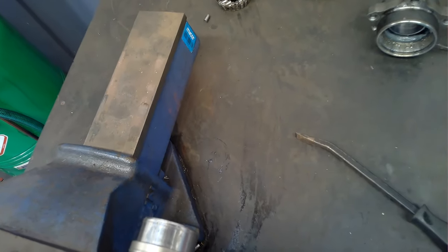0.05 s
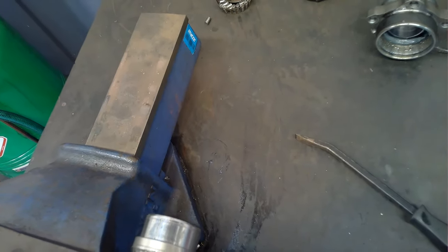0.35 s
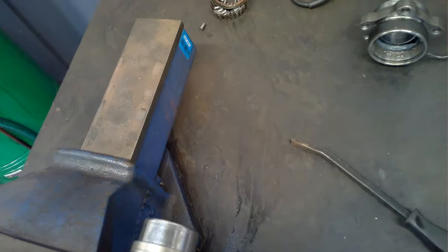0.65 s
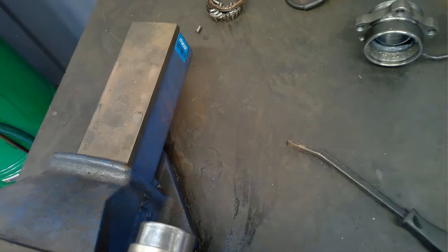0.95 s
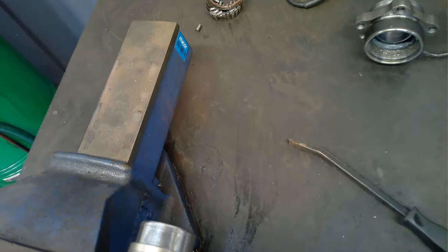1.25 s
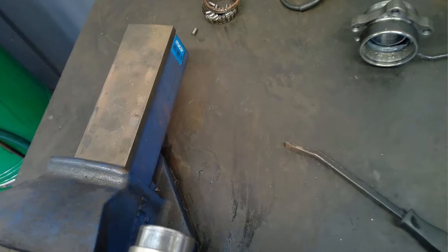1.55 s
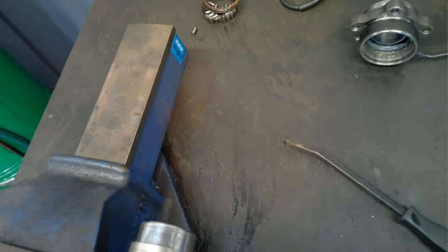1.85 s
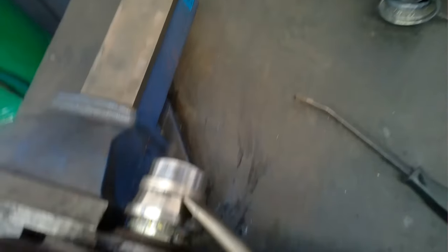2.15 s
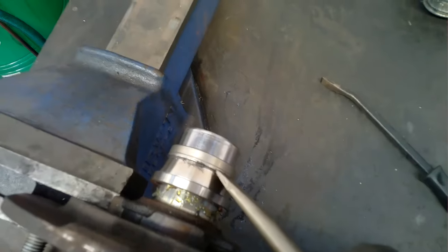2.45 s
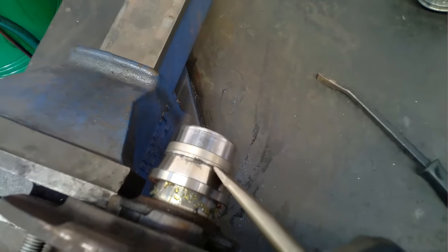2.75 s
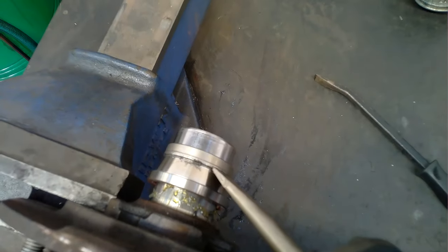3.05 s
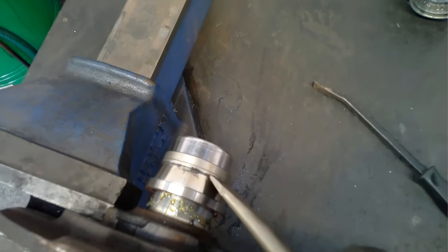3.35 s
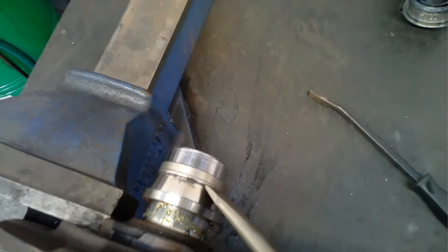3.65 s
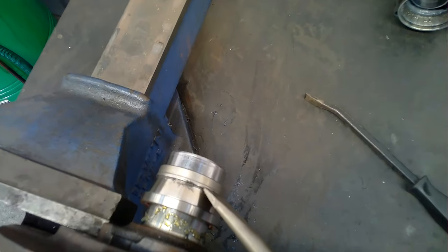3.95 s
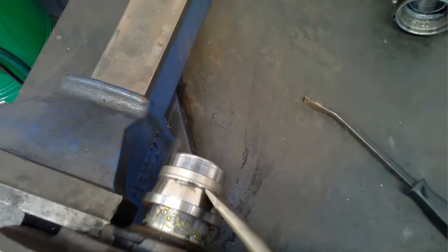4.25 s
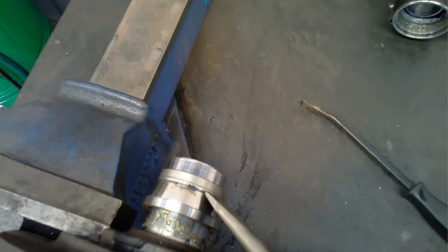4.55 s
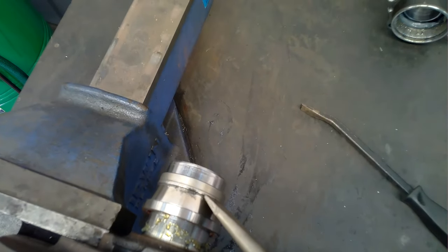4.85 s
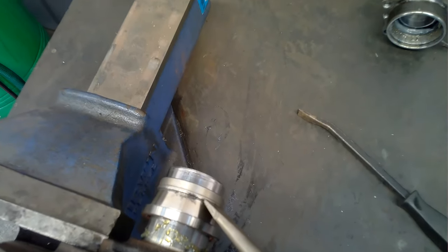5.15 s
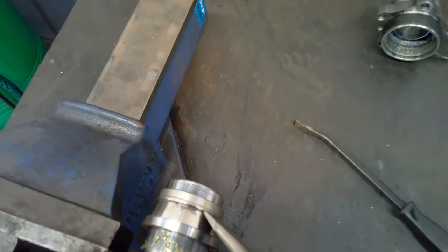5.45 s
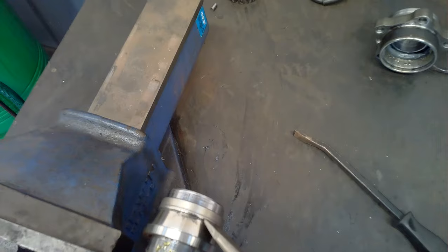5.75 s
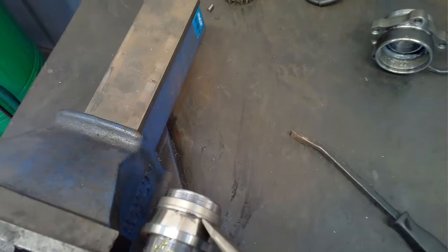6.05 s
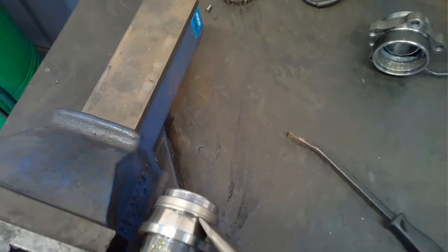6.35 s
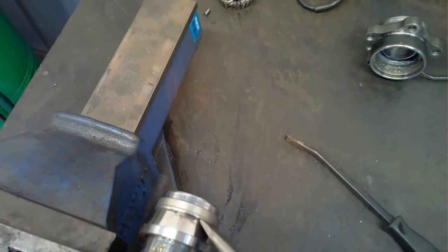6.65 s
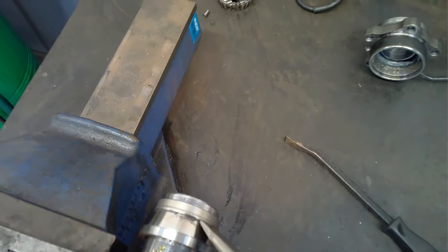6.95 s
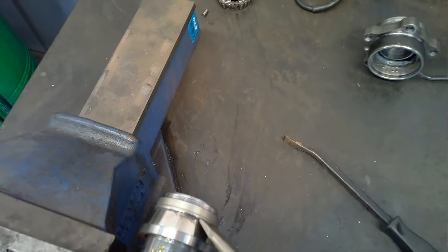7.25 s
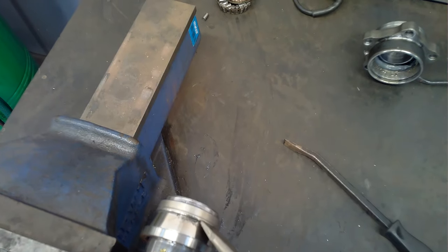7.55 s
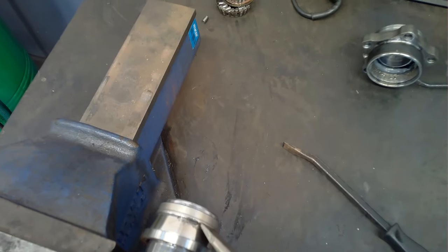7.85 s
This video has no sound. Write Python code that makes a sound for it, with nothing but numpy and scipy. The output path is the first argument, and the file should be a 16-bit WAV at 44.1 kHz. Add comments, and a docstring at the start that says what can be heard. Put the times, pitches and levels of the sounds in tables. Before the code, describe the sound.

Rapid, continuous air hammer blows on metal in a small workshop, ringing shrilly over puffing air and a bench drone.

```python
"""An air hammer drives a pointed chisel against a seized steel collar in a vise, about 56 blows a second.
Each cycle opens with an exhaust puff, a rush of spent air and a thud through the bench; then the blow
lands and rings chisel, collar and vise into a high, clattering whine in the small workshop.
Near 2 s the stereo microphone moves close over the chisel and the bench drones more deeply.
From 5 to 6 s it draws back, and the hammer runs on, sagging to about 53 blows a second."""
import sys
import numpy as np
from scipy import signal
from scipy.fft import rfft, irfft
from scipy.io import wavfile
from scipy.ndimage import uniform_filter1d

SR = 44100
rng = np.random.default_rng(int(sys.argv[2]) if len(sys.argv) > 2 else 0)


def inscribe(sig):
    """Save sig as 16-bit PCM at rate SR to the path in sys.argv[1].

    A 1-D sig is mono; a 2-D sig holds one channel per row.
    Samples are clipped to [-1, 1] before scaling.
    """
    pcm = np.round(np.clip(np.atleast_2d(sig).T, -1, 1) * 32767)
    wavfile.write(sys.argv[1], SR, pcm.astype(np.int16))


N = 352800
T = np.arange(N) / SR

# How the work is held: time_s, stance (0 first grip, 1 microphone close over the chisel, 2 drawn back)
STANCE_PATH = [(0, 0), (1.9, 0), (2.12, 0.82), (4.9, 1.04), (5.9, 2), (8, 2)]


def amp(db):
    """Decibels to gain."""
    return 10 ** (np.asarray(db) / 20)


def unit(x):
    """Scales to rms 1."""
    return x / np.sqrt(np.mean(x ** 2) + 1e-20)


def curve(rows):
    """A time table's value at every sample."""
    return np.interp(T, *np.transpose(rows))


def by_stance(levels):
    """A level given for each stance, gliding as the stance shifts."""
    return np.interp(curve(STANCE_PATH), np.arange(len(levels)), levels)


def read(points, hz):
    """A spectrum's value at hz, on a log-frequency axis."""
    freqs, values = np.transpose(points)
    return np.interp(np.log(hz + 1), np.log(freqs), values)


def convolve(x, responses):
    """One signal through each response, a channel apiece."""
    return signal.oaconvolve(np.atleast_2d(x), responses, axes=1)[:, :N]


def mic_ports(hz):
    """Gain and phase at the microphone's left and right port."""
    # Phase between the ports: freq_hz, left_lead_rad
    lead = [(56, 0.43), (112, 1.23), (180, 2.44), (600, 2.2), (1100, 1.31), (1600, 2.27), (2150, 1.54),
            (2400, 0.4), (2700, 0.59), (3000, 1.9), (3450, 2.25), (4500, 0.21)]
    # Balance between the ports: freq_hz, left_over_right_db
    balance = [(56, -1), (112, 2.5), (300, -5), (700, -4), (1000, -4), (1500, -5.5), (2500, 0.5),
               (7500, 0.5), (9000, -2), (10000, -3.5), (11500, -5.5), (14000, -2)]
    left = amp(read(balance, hz) / 2)
    return np.array([left * np.exp(1j * read(lead, hz)), 1 / left])


def noise(spectrum, size):
    """Coloured noise, partly alike at the two microphone ports."""
    # Likeness of left and right: freq_hz, coherence
    likeness = [(50, 0.62), (150, 0.34), (400, 0.64), (1500, 0.087), (3300, 0.66), (5000, 0.068),
                (12000, 0.1)]
    hz = np.fft.rfftfreq(size, 1 / SR)
    common, apart = rfft(rng.standard_normal((2, size)))
    same = np.clip(read(likeness, hz), 0, 1)
    pair = np.array([common, same * common + np.sqrt(1 - same ** 2) * apart])
    return unit(irfft(pair * mic_ports(hz) * amp(read(spectrum, hz)), size))


def clicks(times, spread_db):
    """A band-limited click of random size at each time."""
    centres = times[:, None] * SR
    taps = np.floor(centres).astype(int) + np.arange(-8, 9)
    shape = np.sinc(taps - centres) * np.cos(np.pi * (taps - centres) / 18) ** 2
    shape *= amp(spread_db * rng.standard_normal(centres.shape))
    return unit(np.bincount(np.clip(taps, 0, N).ravel(), shape.ravel(), N + 1)[:N])


def bursts(times, rise_s, decay_s):
    """An envelope that swells after each time and dies away."""
    t = np.arange(4096) / SR
    swell = (1 - np.exp(-t / rise_s)) * np.exp(-t / decay_s)
    return unit(convolve(clicks(times, spread_db=.35), [swell])[0])


def jittered(times, spread_s):
    """The same times, each slightly early or late."""
    return times + spread_s * rng.standard_normal(len(times))


def piston():
    """Times at which the piston passes the exhaust port, once a cycle."""
    # Piston speed: time_s, blows_per_s
    speed = [(0, 56.5), (0.19, 58.01), (0.45, 54.33), (0.79, 57.91), (1.52, 55.73), (2.11, 57.18),
             (2.33, 54.86), (2.59, 56.93), (2.92, 57.29), (3.42, 55.84), (4.59, 55.62), (4.82, 54.29),
             (5.52, 55.76), (5.75, 53.37), (6.0, 54.02), (6.3, 52.83), (6.71, 55.01), (8, 52.72)]
    cycles = np.cumsum(curve(speed)) / SR - .405
    return np.interp(np.arange(int(cycles[-1]) + 1), cycles, T)


def workshop(x, size=22050):
    """The room's diffuse tail, lingering longest around 5 kHz."""
    # Room decay: freq_hz, t60_s
    decay = [(100, 0.26), (1000, 0.047), (5000, 0.82), (14000, 0.017)]
    hz, t, wash = signal.stft(rng.standard_normal((2, size)), SR, nperseg=256)
    tail = signal.istft(wash * amp(-60 * t / read(decay, hz)[:, None]), SR, nperseg=256)[1]
    tail *= np.arange(tail.shape[1]) / SR > .005  # pre-delay
    return convolve(x, tail / np.linalg.norm(tail[0]))


def bench(times, waver_db=.2, waver_s=.44):
    """Recoil thumps the bench; a low mode sings out when a multiple of the blow rate meets it."""
    # Modes of bench and vise stand: pitch_hz, width_hz, grip_db, close_db, back_db
    bench_modes = [(53, 22, -75, -59, -64), (110.3, 48, -58, -59.5, -56), (219.4, 20, -61, -55, -63.5),
                   (275.6, 18, -70, -59.5, -64.5), (406.7, 15, -73.5, -59, -67), (746, 19, -70, -60.5, -71)]
    t = np.arange(4096) / SR
    recoil = clicks(times, spread_db=3.5)
    drone = 0
    for hz, width, *levels in bench_modes:
        # each mode swells and sinks as the pressure on the tool wavers
        waver = np.interp(T / waver_s, np.arange(64), rng.standard_normal(64))
        thud = np.exp(-np.pi * width * t) * np.sin(2 * np.pi * hz * t)
        drone += amp(by_stance(levels) + waver_db * waver) * unit(convolve(recoil, [thud]))
    return drone * amp([[-1], [1]])  # leans right


def spent_air(times):
    """Turbulent air rushes and hisses out each time the exhaust opens."""
    # Colour of the turbulence: freq_hz, level_db
    colour = [(12, -15), (40, -2.5), (120, -1), (300, -3), (600, -4), (1000, -8.5), (2100, -4.5),
              (2400, -12), (2750, -6), (3200, -10), (7000, -10.5), (11000, -22), (15000, -29)]
    return noise(colour, N) * bursts(times, rise_s=.0016, decay_s=.026)


def exhaust(times, size=4096):
    """A sharp pressure step each cycle, coloured by the exhaust passage."""
    # Colour of one puff: freq_hz, level_db
    colour = [(30, -13), (110, -4.5), (200, -1), (330, -2.5), (450, 2), (570, 1), (640, -7), (745, 1.5),
              (950, -9.5), (1300, -5), (2170, -4), (2380, -39), (4000, -15.5), (9000, -64.5)]
    hz = abs(np.fft.fftfreq(size, 1 / SR))
    # minimum phase keeps the attack sharp
    spectrum = np.exp(np.conj(signal.hilbert(read(colour, hz) * np.log(10) / 20)))
    half = size // 2 + 1
    preroll_s = 70 / SR  # room for the left port to lead
    delay = np.exp(-2j * np.pi * hz[:half] * preroll_s)
    puff = irfft(spectrum[:half] * mic_ports(hz[:half]) * delay)
    steps = clicks(times - preroll_s - .0003, spread_db=.45)
    return unit(convolve(steps, puff[:, :size // 2]))


def clatter(times, rise_s=.006, decay_s=.025, size=4096):
    """Countless small high modes, alike at every blow, and the fresh scraping of the tip."""
    # Colour of the chisel rattling in its socket: freq_hz, level_db
    colour = [(300, -29), (1500, -10), (2100, 8.5), (2350, -4), (2750, -3), (3250, 8.5), (4500, 10),
              (6600, 10.5), (7300, 3), (9500, 6), (11800, 2.5), (13000, -2), (15000, -10)]
    t = np.arange(size) / SR
    small_modes = noise(colour, size) * (1 - np.exp(-t / rise_s)) * np.exp(-t / decay_s)
    scrape = noise(colour, N) * bursts(times, rise_s, decay_s)
    rattle = convolve(clicks(times, spread_db=1.2), small_modes)
    return unit(.96 * unit(rattle) + unit(scrape))


def steel(times, rise_s=.0042, choke_s=.036, damping=.36, drift_rad=.26, scatter_rad=.5, size=2000):
    """Each blow rings the steel's modes; the tip, pressed home again, chokes what is left."""
    # Resonances of chisel, collar and vise, levels relative to one another:
    # pitch_hz, cluster_width_hz, grip_db, close_db, back_db, left_over_right_db, left_lead_rad
    resonances = [(2456, 84, -56.5, -58, -58, -4, 3.1), (3075, 150, -61, -60, -68, -1, 2),
                  (3491, 165, -57, -53, -58, 3, 3), (3700, 63, -53, -57, -49, 2.5, -1.2),
                  (3820, 46, -61, -54, -54, -3, -1.5), (4070, 195, -48, -51, -45.5, 2.5, 3.5),
                  (4190, 96, -58, -52, -48, -0.5, -3.5), (4414, 86, -56, -59, -60, -1, 0),
                  (4525, 94, -65, -53.5, -52.5, -5, 0.3), (4732, 133, -48.5, -51, -47.5, 3.5, -1.85),
                  (4890, 180, -60, -68, -60, -2, 0.2), (5030, 43, -55, -51, -50, 1, -2),
                  (5114, 133, -46, -50, -65, 4.5, -2), (5277, 210, -51, -51, -52.5, -1, -1.1),
                  (5400, 34, -58, -61, -59, 9, -0.5), (5673, 90, -72, -51.5, -41, 4, -0.2),
                  (5738, 104, -41, -37.5, -44.5, 5.5, -2), (5833, 47, -47, -40.5, -46, 5, -1.6),
                  (5964, 32, -48.5, -51, -56, 7.5, -1.6), (6160, 70, -58, -47.5, -54, 8, 0),
                  (6365, 75, -51.5, -48, -46.5, 6, 0.5), (6530, 130, -67, -56, -68, -1, 1),
                  (6760, 60, -59, -66, -60, 8, 2), (6760, 69, -47.5, -50, -55, -1, -2.5),
                  (7650, 170, -64, -67, -67, 1, 1), (8230, 76, -65, -62, -69, -2, 1.5),
                  (8780, 63, -56.5, -53.5, -60.5, -3.5, 2), (9500, 170, -61.5, -62.5, -64, -15.5, 4),
                  (10170, 100, -83, -69, -73, 2, 0.0), (10560, 114, -65.5, -67.5, -66, -22.5, -1),
                  (11700, 230, -76, -67.5, -69, 12, 1.5)]
    # the clamped, nearly round collar splits each resonance into three close partials
    hz, width, *levels, pan_db, lead = np.repeat(np.array(resonances, float), 3, axis=0).T
    hz = hz + width * np.resize([-.34, 0, .34], len(hz)) * rng.uniform(.8, 1.2, len(hz))
    t = np.arange(size) / SR
    # the ring builds while the shock runs to and fro in the steel
    attack = 1 - np.exp(-t / rise_s)
    envelope = attack * np.exp(-np.pi * damping * width[:, None] * t - (t / choke_s) ** 4)
    envelope /= np.linalg.norm(envelope, axis=1, keepdims=True)
    partials = envelope * np.exp(2j * np.pi * hz[:, None] * t)
    stance = np.interp(times, *np.transpose(STANCE_PATH))[:, None]
    level_db = sum(np.clip(1 - abs(stance - k), 0, 1) * level for k, level in enumerate(levels))
    # the partials' phases drift slowly and scatter from blow to blow, so the ring shimmers
    drift, scatter = rng.standard_normal((2, len(times), len(hz)))
    phase = rng.uniform(0, 2 * np.pi, len(hz)) + drift_rad * np.cumsum(drift, 0) + scatter_rad * scatter
    starts = np.maximum(times * SR, 0).astype(int)
    whine = np.zeros((2, N + 2 * size))
    for channel, side in enumerate((.5, -.5)):
        strikes = amp(level_db + side * pan_db) * np.exp(1j * (phase + side * lead))
        for start, ring in zip(starts, (strikes @ partials).real):
            whine[channel, start:start + size] += ring
    # the piston feeds in power at an even rate
    power = uniform_filter1d((whine[:, :N] ** 2).mean(0), size=2400)
    return whine[:, :N] / np.sqrt(abs(power) + 1e-6 * power.mean())


def scene(travel_s=.0009):
    """Puffs, blows and rushing air, all timed by the piston."""
    # faders for the three stances: grip, close, back
    ring_db, clatter_db = (-37.5, -35, -36.5), (-48, -47.5, -48)
    exhaust_db, rush_db = (-44.5, -43.5, -44.5), (-46, -45.5, -45)
    cycles = piston()
    opens = jittered(cycles, spread_s=.00007)
    lands = jittered(cycles + travel_s, spread_s=.00004)  # the piston lands just after the port opens
    metal = amp(by_stance(ring_db)) * steel(lands) + amp(by_stance(clatter_db)) * clatter(lands)
    puffs = amp(by_stance(exhaust_db)) * exhaust(opens)
    rush = amp(by_stance(rush_db)) * spent_air(opens)
    room = amp(-13.5) * workshop(metal + puffs)
    return metal + puffs + rush + bench(opens) + room


def record(dry, cutoff_hz=15250):
    """A fast limiter softens each swell of the ring; a steep low-pass trims the top."""
    power = (dry ** 2).mean(0) + 1e-12
    swell = uniform_filter1d(power, size=170) / uniform_filter1d(power, size=4000)
    limited = dry / np.maximum(swell, .8) ** .25
    lowpass = signal.firwin(511, cutoff_hz, window=("kaiser", 9), fs=SR)
    return signal.oaconvolve(limited, lowpass[None], "same")


dry = scene()
out = record(dry)
inscribe(out)
```